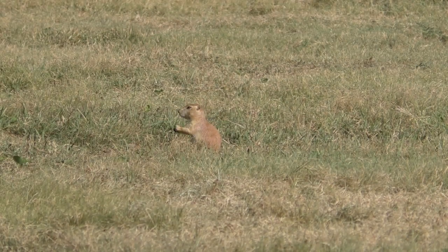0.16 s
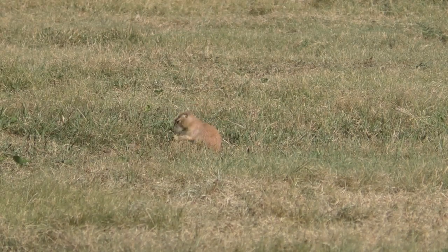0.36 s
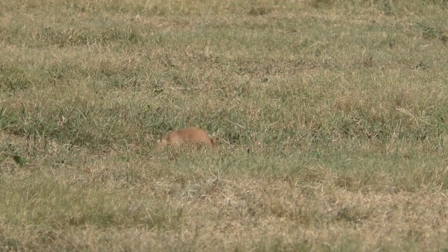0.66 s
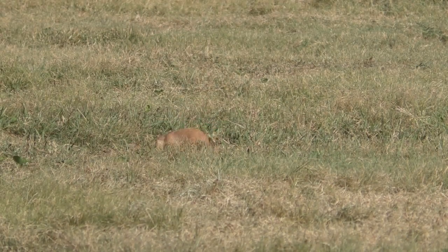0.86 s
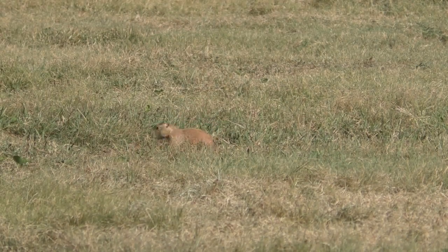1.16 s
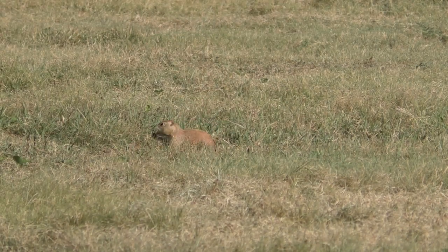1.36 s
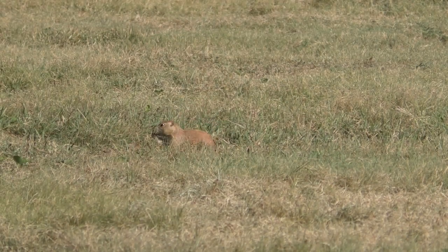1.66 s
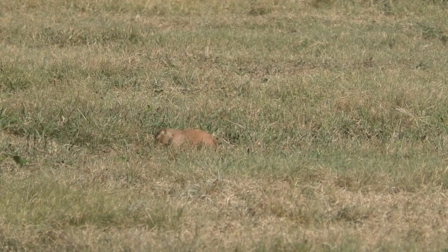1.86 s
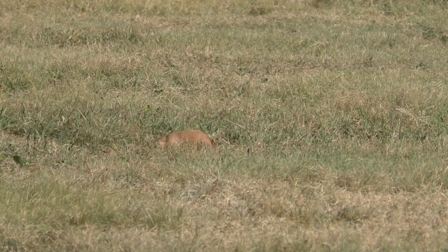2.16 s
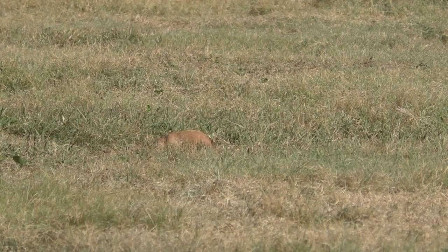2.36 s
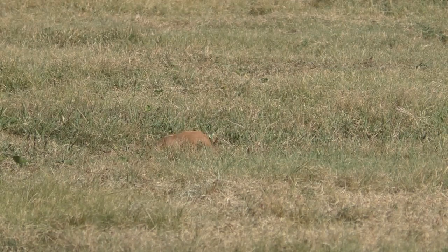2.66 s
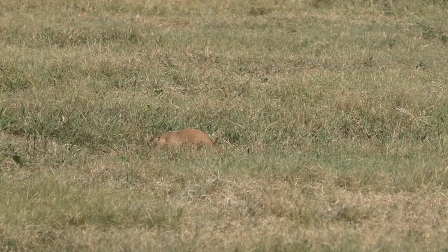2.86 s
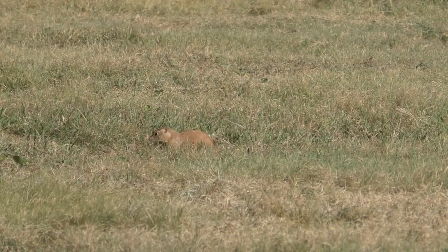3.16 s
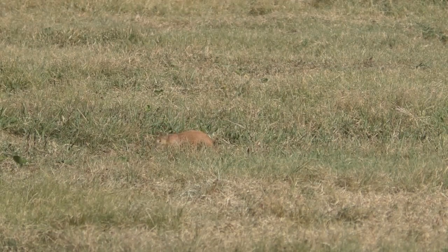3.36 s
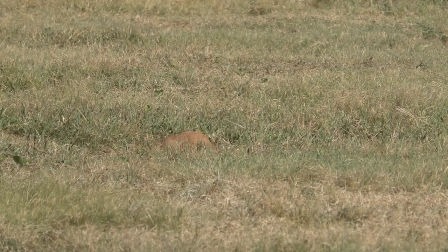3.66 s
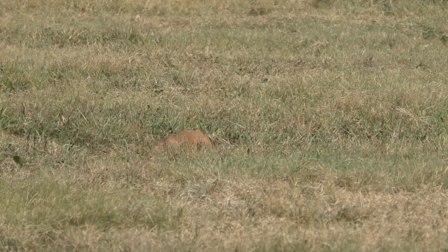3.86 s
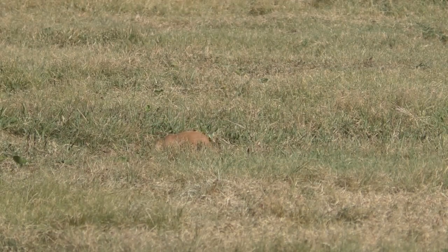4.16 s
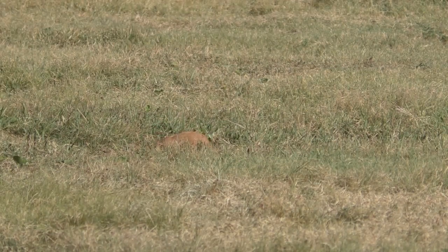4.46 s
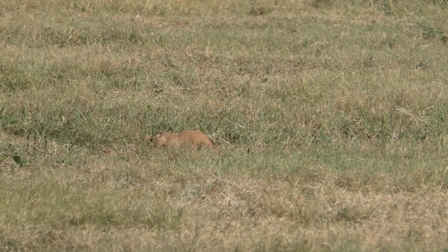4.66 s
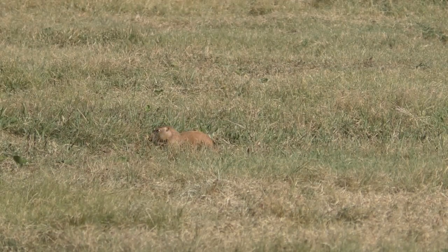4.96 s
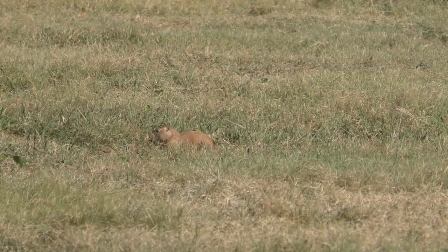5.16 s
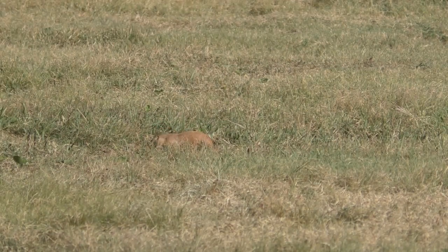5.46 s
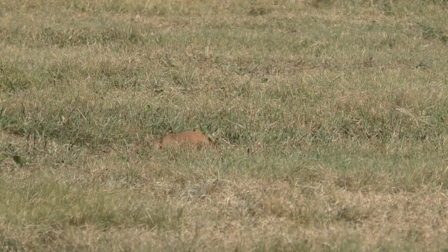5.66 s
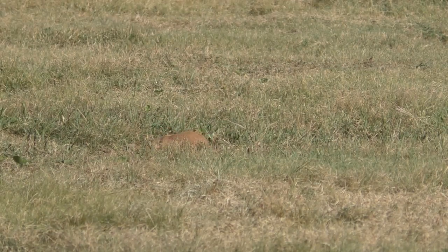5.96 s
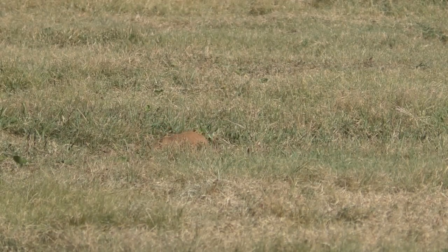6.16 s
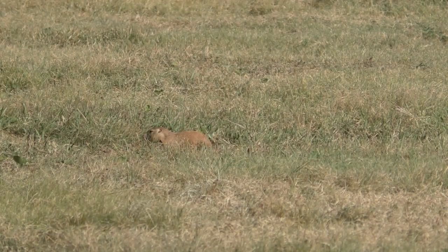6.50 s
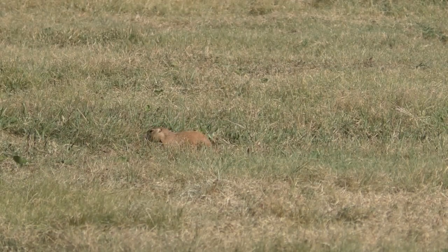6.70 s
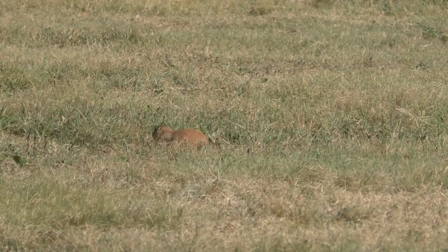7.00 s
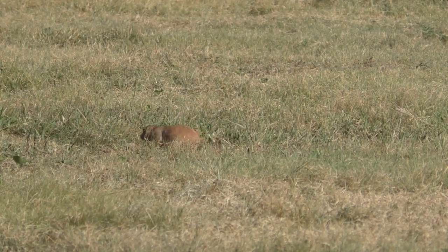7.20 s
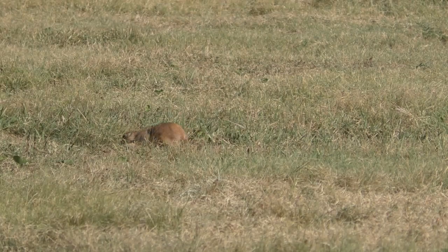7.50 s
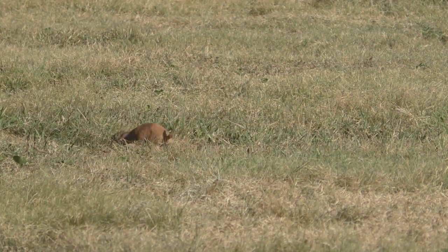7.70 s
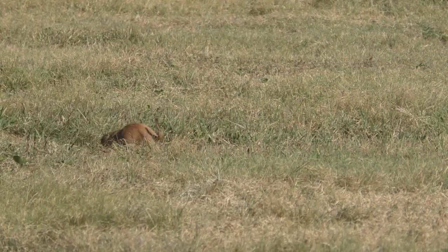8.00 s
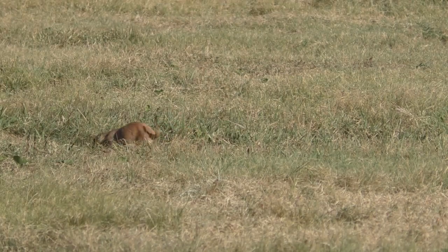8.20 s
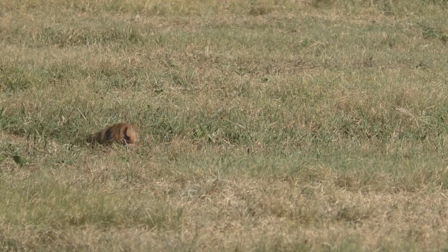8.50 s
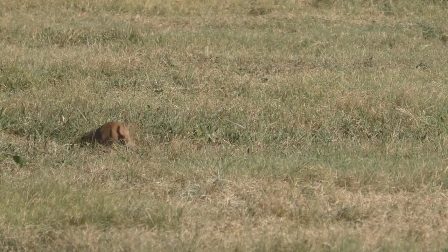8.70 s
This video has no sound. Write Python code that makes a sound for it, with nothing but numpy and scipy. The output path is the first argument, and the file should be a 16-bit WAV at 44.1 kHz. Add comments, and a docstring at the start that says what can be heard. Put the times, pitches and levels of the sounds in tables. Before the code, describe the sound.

On an open grassy plain, wind rumbles unevenly on the microphone while a prairie dog repeats a high, trilling bark, six calls in all, a little to the left. The barking stops about halfway, leaving regular high katydid rasps, a faint cricket and a few soft, distant bird whistles over a steady airy hiss. Toward the end come a few dry snaps of grass and a short rustle.

```python
"""Prairie dog on windy grassland

Off to the left, one bark is just dying away and six more follow, each a rising yelp that breaks into a
fast pitch trill, coloured by the throat and scattered by the field. Katydids rasp their wing files,
a cricket trills, far birds whistle, dry grass snaps and the wind buffets the microphone."""
import sys
import numpy as np
from scipy import signal
from scipy.fft import rfft, irfft, next_fast_len
from scipy.io import wavfile
from scipy.ndimage import uniform_filter1d

SR = 44100
rng = np.random.default_rng(int(sys.argv[2]) if len(sys.argv) > 2 else 0)


def persist_wave(psi):
    """Save psi, clipped to +-1, as 16-bit WAV."""
    counts = np.round(np.clip(psi, -1, 1) * 32767).astype(np.int16)
    wavfile.write(sys.argv[1], SR, np.atleast_2d(counts).T)


N = 389844
T = np.arange(N) / SR

# resonances of the prairie dog's throat and mouth: (frequency [Hz], gain [dB])
THROAT = [(700, -30.5), (1100, -18.5), (1500, -15), (1750, -15), (2130, -2.5), (2500, -3.5), (2950, 2),
          (3350, -7.5), (3600, -17), (4150, -8.5), (4800, -29), (5600, -13.5), (6900, -13.5), (7700, -29),
          (9500, -25), (11000, -31.5), (15500, -36)]


def from_db(db):
    return 10 ** (np.asarray(db) / 20)


def rms_one(x):
    return x / np.sqrt(np.mean(x ** 2) + 1e-20)


def in_time(points):
    return np.interp(T, *np.transpose(points))


def at_hz(points, hz):
    """Read a curve along a log frequency axis."""
    knot_hz, values = np.transpose(points)
    return np.interp(np.log(np.maximum(hz, 1)), np.log(knot_hz), values)


def panned(x, pan_db):
    """Stereo, with the left pan_db louder than the right."""
    return np.array([x * from_db(pan_db / 2), x * from_db(-pan_db / 2)])


def coloured(x, spectrum):
    """Equalise by a curve of (frequency [Hz], gain [dB])."""
    size = next_fast_len(x.shape[-1])
    gain = from_db(at_hz(spectrum, np.arange(size // 2 + 1) * SR / size))
    return irfft(rfft(x, size) * gain, size)[..., :x.shape[-1]]


def drift(rate_hz, size=N):
    """Random wander of RMS 1: noise twice through a one-pole low-pass."""
    r = np.exp(-2 * np.pi * rate_hz / SR)
    return rms_one(signal.lfilter([1], [1, -2 * r, r * r], rng.standard_normal(size + 9000))[9000:])


def resonance(x, hz, width_hz, passes=2):
    """Two-pole band-passes in series."""
    r = np.exp(-np.pi * width_hz / SR)
    gain = (1 - r * r) / 2
    for _ in range(passes):
        x = signal.lfilter([gain, 0, -gain], [1, -2 * r * np.cos(2 * np.pi * hz / SR), r * r], x)
    return x


def swells(rows):
    """Bell-shaped stereo envelopes from (middle [s], half length [s], level [dB], pan [dB])."""
    out = np.zeros((2, N))
    for s, half, db, pan_db in rows:
        span = slice(max(int((s - 2 * half) * SR), 0), int((s + 2 * half) * SR))
        out[:, span] += panned(np.exp(-2 * ((T[span] - s) / half) ** 2) * from_db(db), pan_db)
    return out


def gate(start, end, fade_s):
    """Fade in, hold at 1, fade out."""
    return np.clip(np.minimum(T - start, end - T) / fade_s, 0, 1)


def pulses(per_s, decay):
    """Stereo noise in decaying pulses at a slightly uneven rate."""
    cycle = np.cumsum(per_s * (1 + 0.044 * drift(14))) / SR % 1
    return rng.standard_normal((2, N)) * np.exp(-decay * cycle)


def fading_bark(level_db=-23.5, t60_s=0.19):
    """The echoes of an earlier bark die away as throat-coloured noise."""
    noise = rms_one(coloured(rng.standard_normal((2, N)), THROAT))
    return noise * from_db(level_db - 60 * T / t60_s)


def wind():
    """Wind buffets the microphone: lumpy rumble, mostly separate on each side."""
    # rumble colour: (frequency [Hz], gain [dB])
    buffet = [(12, -39), (20, -7.5), (82, 3), (109, -2), (230, -13.5), (366, -20.5), (400, -34.5),
              (520, -28), (880, -120)]
    # breeze under the gusts: (time [s], level [dB])
    breeze = [(0, -55), (.8, -47), (1.6, -48), (2.1, -35.5), (2.5, -53), (3.3, -42.5), (3.8, -49.5),
              (4.4, -41.5), (5.1, -49), (6.5, -53), (7.5, -44.5), (8.84, -50.5)]
    # single gusts: (middle [s], half length [s], level [dB], pan [dB])
    gusts = [(1.34, 0.055, -39.5, -3), (1.79, 0.098, -43, -5), (2.0, .07, -30, -2), (2.2, 0.19, -36.5, -3),
             (2.58, .03, -42, 10), (2.72, 0.087, -34.5, 2), (2.85, 0.035, -35, -8), (3.12, 0.027, -40, -15),
             (3.39, .05, -38.5, -4), (3.6, 0.059, -32.5, -4), (4.07, 0.14, -41.5, 3),
             (4.37, 0.094, -38.5, -5), (4.55, 0.11, -34, 4), (5.7, 0.063, -46, -3), (5.81, 0.017, -32, 3),
             (6.97, .04, -49, -2), (7.19, 0.023, -38, -6), (7.41, 0.032, -43, -4), (7.67, 0.075, -45, -9),
             (8.22, 0.019, -46, 1), (8.39, 0.055, -51, 9), (8.67, 0.029, -34.5, -1)]
    shared, left, right = rng.standard_normal((3, N))
    rumble = rms_one(coloured(np.array([left + 0.59 * shared, right + 0.53 * shared]), buffet))
    lumps = from_db([4.4 * drift(7.8), 2.1 * drift(2.2)])
    return rumble * lumps * (from_db(in_time(breeze)) + swells(gusts))


def air():
    """A wide bed of noise: the distant hum of the plain and microphone hiss."""
    # bed colour: (frequency [Hz], gain [dB])
    colour = [(59, -23), (100, -1.5), (349, -6), (510, -12.5), (592, -21.5), (686, -17.5), (779, -23.5),
              (1000, -13.5), (1710, -12), (3810, -20.5), (4610, -26), (5580, -27.5), (6330, -31),
              (11500, -23.5), (15700, -23.5)]
    # bed loudness: (time [s], level [dB])
    levels = [(0.0, -42), (2.0, -42.5), (2.6, -41.5), (4.5, -41.5), (5.0, -43.5), (7.5, -44), (8.84, -42)]
    # stereo likeness: (frequency [Hz], left-right correlation [0-1])
    likeness = [(60, 0.22), (150, 0.11), (380, 0.12), (950, 0.33), (2380, 0.014), (5980, 0.55),
                (15000, 0.35)]
    size = next_fast_len(N)
    hz = np.arange(size // 2 + 1) * SR / size
    mid, side = rfft(rng.standard_normal((2, size))) * from_db(at_hz(colour, hz))
    alike = at_hz(likeness, hz)
    stereo = np.sqrt(1 + alike) * mid + np.sqrt(1 - alike) * side * [[1], [-1]]
    return rms_one(irfft(stereo, size)[:, :N]) * from_db(in_time(levels))


def cricket(dip_db=-9, dip_half_s=.04):
    """A fast trill of noise pulses in one narrow band, with brief dips in level."""
    # trill loudness: (time [s], level [dB])
    levels = [(0, -66), (2.6, -61.5), (4, -63.5), (5.8, -61.5), (6.6, -65), (7.7, -58), (8.3, -63.5),
              (8.84, -57)]
    # dips in the trill: (middle [s])
    dips = [.3, 1.1, 2.26, 3.2, 4.05, 5.03, 5.98, 6.9, 7.83, 8.17]
    mid, side = pulses(per_s=95, decay=0.75)
    band = resonance(np.array([mid + .5 * side, mid - .5 * side]), hz=5455, width_hz=710)
    duck_db = sum(dip_db * np.exp(-((T - s) / dip_half_s) ** 4) for s in dips)
    return rms_one(band) * from_db(in_time(levels) + duck_db)


def birds(scoop_s=0.0213, upturn_s=.025, waver_db=2.5):
    """Far whistles: gliding sines whose level wavers on the way."""
    # notes: (start [s], length [s], pitch [Hz], level [dB], scoop [Hz], climb [Hz/s], upturn [Hz])
    whistles = [(0.152, 0.1, 1636, -39.5, 88, 3300, 390), (3.797, .093, 1654, -46.5, 50.5, 3292, 398),
                (4.01, 0.21, 2690, -55.5, 45, -200, 0), (6.304, 0.12, 2700, -55, 289, -300, 0),
                (7.15, .105, 2710, -56, 18.5, 200, 0), (7.167, 0.065, 1450, -56, 19.5, 0, 0),
                (7.5, .1, 2040, -62, -1.5, -300, 4), (7.727, 0.18, 2716, -54.5, 22.5, 200, 4),
                (8.77, .1, 2630, -54.5, 87, 900, 0), (8.78, 0.088, 867, -51, 3.5, 0, 0)]
    out = np.zeros(N)
    for start, length, held_hz, db, scoop_hz, climb, upturn_hz in whistles:
        t = np.clip(T - start, 0, length)
        scoop = scoop_hz * np.clip(1 - t / scoop_s, 0, 1)
        upturn = upturn_hz * np.clip(1 - (length - t) / upturn_s, 0, 1)
        hz = held_hz + climb * t - scoop + upturn
        tone = np.sqrt(2) * np.sin(2 * np.pi * np.cumsum(hz) / SR)
        out += tone * from_db(db) * gate(start, start + length, fade_s=.12 * length)
    return panned(out * from_db(waver_db * drift(30)), pan_db=0.46)


def field(calls, near_db=-9, near_t60_s=.11, far_db=-12, far_t60_s=0.7):
    """Scatter from nearby ground and mounds, and a dull tail from afar, different on each side."""
    t = T[:SR]
    near = rms_one(rng.standard_normal((2, SR)) * from_db(-60 * t / near_t60_s)) * from_db(near_db)
    far = rms_one(rng.standard_normal((2, SR)) * from_db(-60 * t / far_t60_s)) * from_db(far_db)
    dull_tail = signal.lfilter([.6], [1, -.5], far)
    return signal.fftconvolve(calls, (near + dull_tail) / np.sqrt(SR), axes=1)[:, :N]


def yelp(start, length, top_hz, db):
    """The voice swoops up and sags: knots of (time [s], pitch [Hz], level [dB])."""
    return [(start, .655 * top_hz, db - 13.5),
            (start + .012, .93 * top_hz, db + 1.5),
            (start + .024, top_hz, db),
            (start + length, .935 * top_hz, db + 1),
            (start + .055, .935 * top_hz, db - 4)]


def trill(start, end, level_db, low_hz, final_hz):
    """The voice leaps and slides back, weaker each beat: knots of (time [s], pitch [Hz], level [dB])."""
    # tops of the leaps in all barks: (time [s], pitch [Hz])
    tops = [(.595, 1510), (0.636, 1430), (.675, 1490), (.712, 1500), (.752, 1526), (1.292, 1380),
            (1.325, 1410), (1.362, 1487), (1.402, 1500), (1.442, 1495), (1.987, 1440), (2.025, 1391),
            (2.066, 1510), (2.107, 1506), (2.145, 1506), (2.708, 1420), (2.750, 1372), (2.782, 1472),
            (2.824, 1516), (2.860, 1496), (3.425, 1442), (3.460, 1484), (3.499, 1440), (3.533, 1394),
            (3.569, 1448), (4.458, 1520), (4.501, 1523), (4.537, 1488), (4.564, 1455), (4.597, 1544),
            (4.635, 1506)]
    leap_s, hold_s, slide_s = .010, .005, .013
    beat_loss_db, last_loss_db, low_rise_hz = 1.13, 1.5, 5.66
    beats = [(s, hz) for s, hz in tops if start < s < end]
    next_tops = [s for s, _ in beats[1:]] + [end + leap_s]
    knots = []
    for k, ((s, top_hz), next_s) in enumerate(zip(beats, next_tops)):
        last = next_s > end
        db = level_db - beat_loss_db * k - last_loss_db * last
        landing_hz = final_hz if last else low_hz + low_rise_hz * k
        knots += [(s, top_hz, db), (s + hold_s, top_hz, db),
                  (s + hold_s + slide_s, landing_hz, db + 1), (next_s - leap_s, landing_hz, db + 1)]
    return knots + [(end + 0.023, final_hz, -60)]


def breath(size, hoarseness):
    """Rasp through the throat, hiss in the mouth's top resonance and a low puff."""
    rasp = from_db(-10) * rms_one(coloured(rng.standard_normal(size), THROAT))
    hiss = from_db(-26) * rms_one(resonance(rng.standard_normal(size), hz=6400, width_hz=1500))
    puff = from_db(-32) * rms_one(resonance(rng.standard_normal(size), hz=320, width_hz=150, passes=1))
    return (rasp + hiss) * hoarseness + puff


def bark(start, end, top_hz, yelp_db, trill_db, low_hz, final_hz, fundamental_db, bright_db, rough):
    """Harmonics of a gliding pitch pass the throat; breath and unsteadiness grow into the trill."""
    yelp_s, full_slide_hz_per_s = .04625, 41000
    leap_dip_db, slide_bright_db, high_db, yelp_dull_db = -3.5, 2.5, -3, -7
    knots = yelp(start, yelp_s, top_hz, yelp_db) + trill(start, end, trill_db, low_hz, final_hz)
    s, hz, db = np.array(sorted(knots)).T
    span = slice(int(start * SR), int((end + .008) * SR))
    t = T[span]
    hoarseness = np.clip((t - start) / 0.13, .25, 1)
    unsteady = rough * hoarseness
    glide = uniform_filter1d(np.interp(t, s, hz), size=200)
    falling = np.clip(-np.gradient(glide) * SR / full_slide_hz_per_s, -1, 1)   # negative on the way up
    leaping = np.clip(-falling, 0, 1) * (t > start + yelp_s)
    in_yelp = np.clip(3 - 2 * (t - start) / yelp_s, 0, 1)
    level = from_db(np.interp(t, s, db) + leap_dip_db * leaping)
    pitch = glide * (1 + 0.037 * unsteady * drift(273, len(t)))
    phase = 2 * np.pi * np.cumsum(pitch) / SR
    voice = 0
    for k in range(1, 13):
        flutter = np.clip(1 + unsteady * (0.32 + 0.39 * k) * drift(174, len(t)), 0, 3)
        partial_db = at_hz(THROAT, k * pitch) + fundamental_db * (k == 1)
        partial_db += (bright_db + slide_bright_db * falling) * (k >= 3)
        partial_db += (high_db + yelp_dull_db * in_yelp) * (k >= 5)
        voice += flutter * from_db(partial_db) * np.sin(k * phase + rng.uniform(0, 2 * np.pi))
    out = np.zeros(N)
    out[span] = (voice + breath(len(t), hoarseness)) * level
    return out


def prairie_dog():
    """Six trilled barks from the left."""
    # barks: (start [s], end [s], yelp top [Hz], yelp level [dB], trill level [dB], trill low [Hz],
    # final pitch [Hz], fundamental gain [dB], gain from harmonic 3 up [dB], pan [dB], roughness [0-1])
    barks = [(.526, 0.778, 1130, -17, -18.5, 1085, 1073, 2, -1.5, 5.5, 0.2),
             (1.218, 1.46, 1095, -16, -17.5, 1085, 1378, 1, -1, 5.5, 0.27),
             (1.919, 2.167, 1088, -14, -17, 1065, 1084, -0.5, -2.5, 5, 0.28),
             (2.641, 2.892, 1091, -17.5, -19.5, 1089, 1073, 1, -2.5, 5.5, 0.32),
             (3.358, 3.611, 1092, -17.5, -19.5, 1094, 1051, 2.5, -3.5, 5.5, 0.35),
             (4.396, 4.661, 1140, -22.5, -23, 1285, 1423, 5, -5, 4.5, 0.36)]
    return sum(panned(bark(*shape, rough), pan_db) for *shape, pan_db, rough in barks)


def near_katydids(half_s=0.055):
    """File teeth excite the wing; each rasp swells and fades."""
    # rasps: (middle [s], level [dB], pan [dB])
    rasps = [(0.555, -37.5, 5), (1.38, -40.5, 17), (2.20, -36.5, 4), (3.065, -36, 4), (3.839, -37, 4),
             (4.646, -35.5, 3), (5.428, -38.5, 4), (6.176, -38, 5), (7.016, -39.5, 4), (8.098, -38, 5.5)]
    # wing resonances: (frequency [Hz], width [Hz], gain [dB])
    modes = [(10540, 1300, 3.5), (11570, 2000, 11), (16000, 2000, 10)]
    teeth = pulses(per_s=210, decay=0.49)
    teeth = teeth + 0.5 * teeth.sum(axis=0)   # narrows the stereo image
    wing = rms_one(sum(from_db(db) * resonance(teeth, hz, width) for hz, width, db in modes))
    return wing * swells([(s, half_s, db, pan_db) for s, db, pan_db in rasps])


def far_katydid(step_s=.047, half_s=0.025, first_stroke_db=-4, pan_db=-5):
    """File teeth ring one wing resonance in phrases of four strokes, the first softer."""
    # phrases: (middle of the first stroke [s], level [dB])
    phrases = [(.9, -56), (1.53, -49.5), (2.245, -51), (7.095, -52.5), (7.795, -49.5), (8.62, -51.5)]
    teeth = pulses(per_s=210, decay=1.0)
    wing = rms_one(resonance(teeth, hz=11800, width_hz=2600))
    return wing * swells([(s + k * step_s, half_s, db + first_stroke_db * (k == 0), pan_db)
                          for s, db in phrases for k in range(4)])


def grass(click_cutoff_hz=2100, tail_db=-7, tail_t60_s=.025):
    """Dry stalks snap, each a dull click with a short noisy tail, and rustle in crackly spells."""
    # dry grass colour: (frequency [Hz], gain [dB])
    colour = [(240, -28), (400, 0.5), (636, -9), (1120, -1), (3820, -17), (5560, -26), (8000, -36),
              (10400, -60), (17600, -120)]
    # snapping stalks: (time [s], peak [dB], pan [dB])
    snaps = [(7.779, -21.5, 0), (7.801, -26, 1), (7.869, -34, 2), (8.058, -31.5, 2)]
    # rustles: (start [s], end [s], level [dB])
    rustles = [(2.399, 2.49, -61), (2.507, 2.634, -48), (7.834, 8.061, -45)]
    noise = rms_one(coloured(rng.standard_normal((2, N)), colour))
    impulse = np.arange(N) == N // 2
    low_pass = signal.butter(2, click_cutoff_hz, fs=SR, output="sos")
    click = signal.sosfilt(low_pass, coloured(impulse, colour))
    click /= click.max()
    clicks = tails = 0
    for s, db, pan_db in snaps:
        clicks += panned(from_db(db) * np.roll(click, int(s * SR) - N // 2), pan_db)
        tails += panned(from_db(db + tail_db - 60 * np.abs(T - s) / tail_t60_s) * (T >= s), pan_db)
    spells = sum(from_db(db) * gate(start, end, fade_s=0.018) for start, end, db in rustles)
    crackle = spells * from_db(2.4 * drift(60))
    return clicks + noise * (tails + crackle)


def scene():
    """Barks and whistles echo over the field; insects, grass and wind stay dry."""
    calls = prairie_dog() + birds()
    return (calls + field(calls) + fading_bark() + near_katydids() + far_katydid() + cricket()
            + grass() + wind() + air())


def record(dry):
    """A steep low-pass cuts the very top."""
    cutoff_hz = 15800
    return signal.sosfilt(signal.ellip(12, .5, 75, cutoff_hz, fs=SR, output="sos"), dry)


dry = scene()
out = record(dry)
persist_wave(out)
```